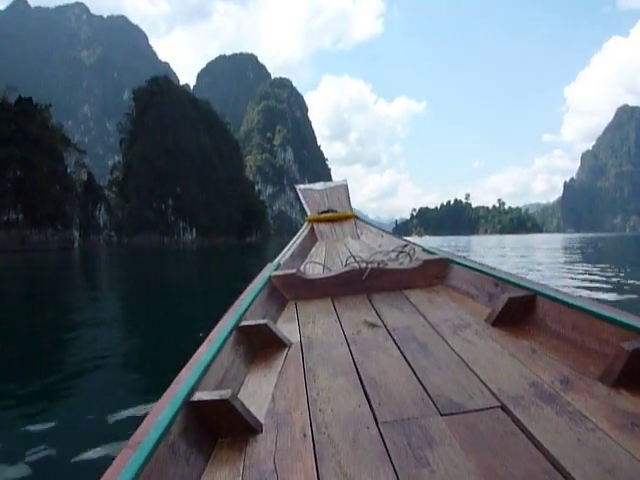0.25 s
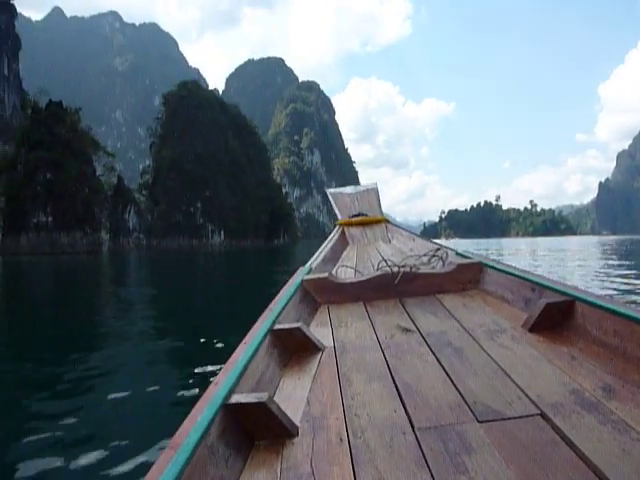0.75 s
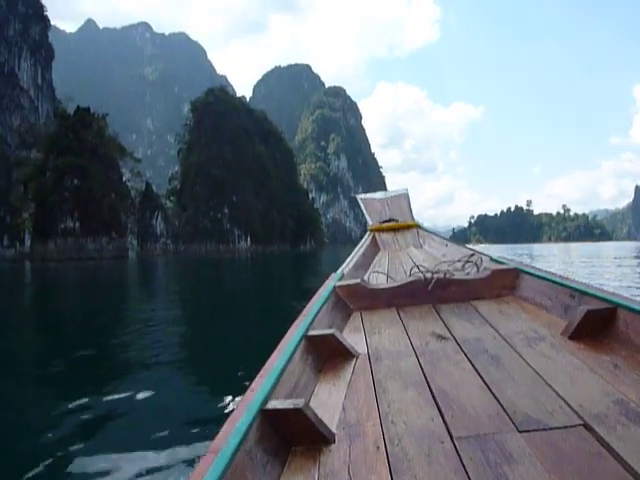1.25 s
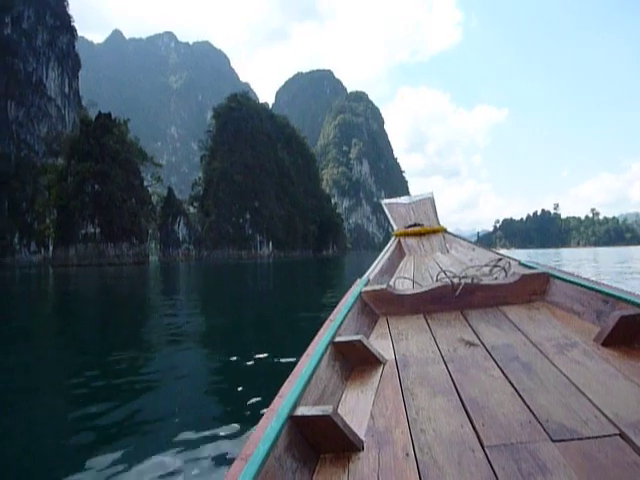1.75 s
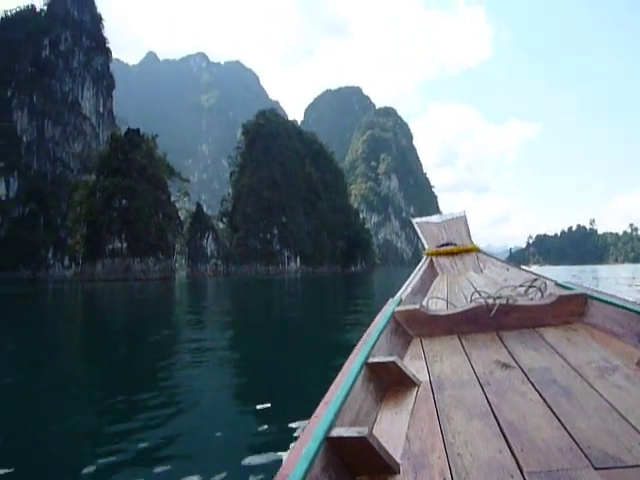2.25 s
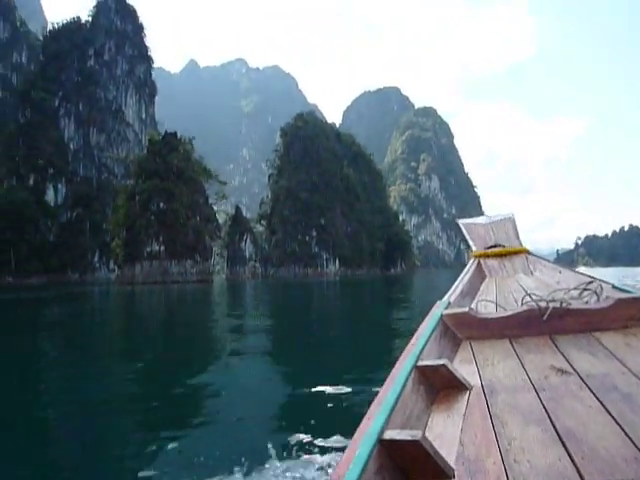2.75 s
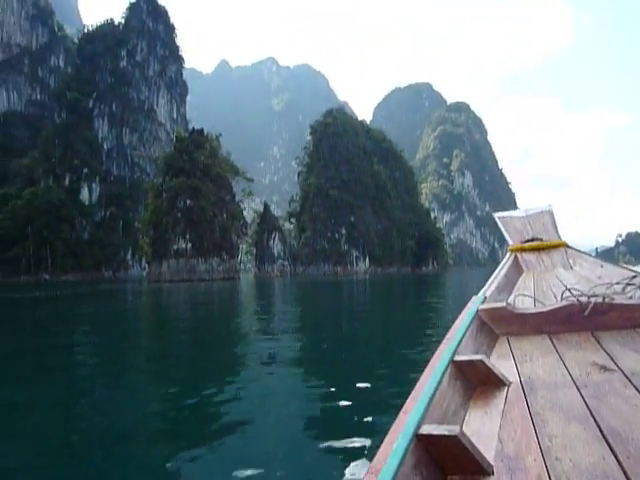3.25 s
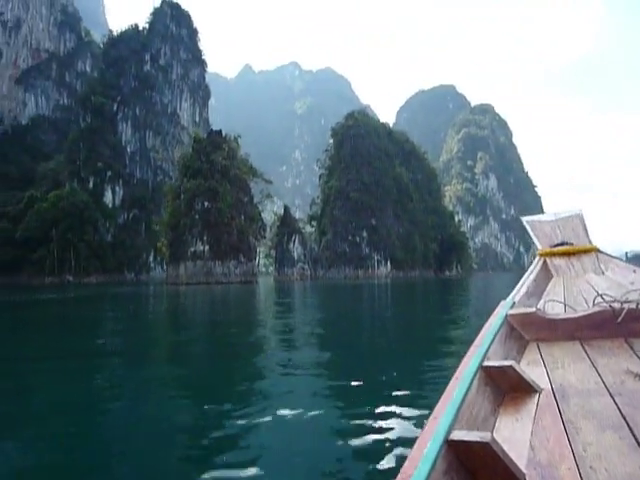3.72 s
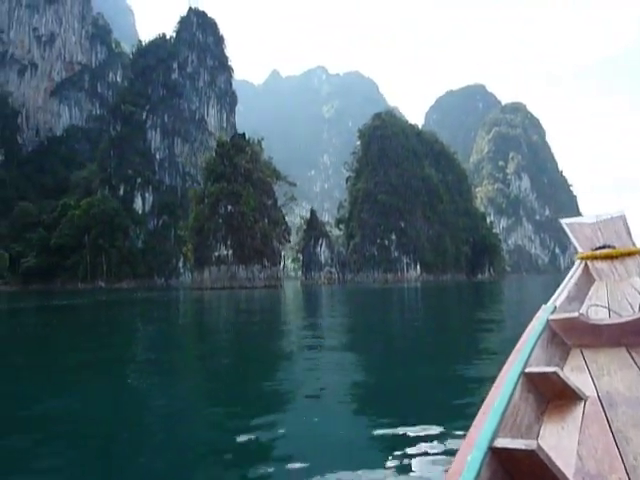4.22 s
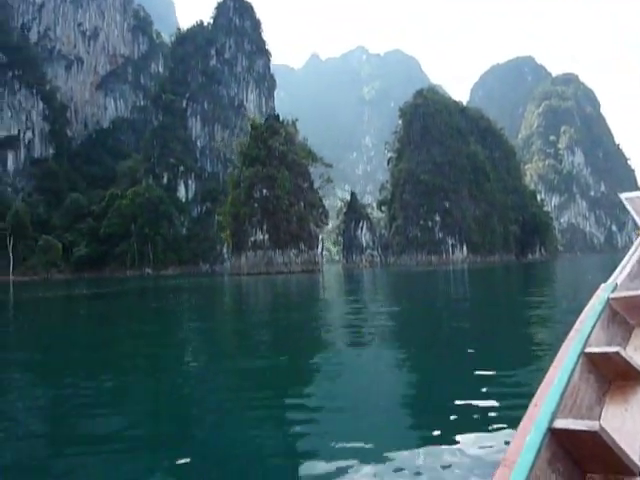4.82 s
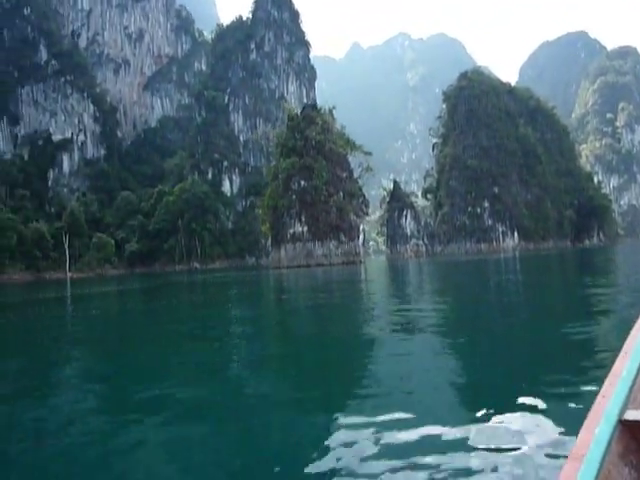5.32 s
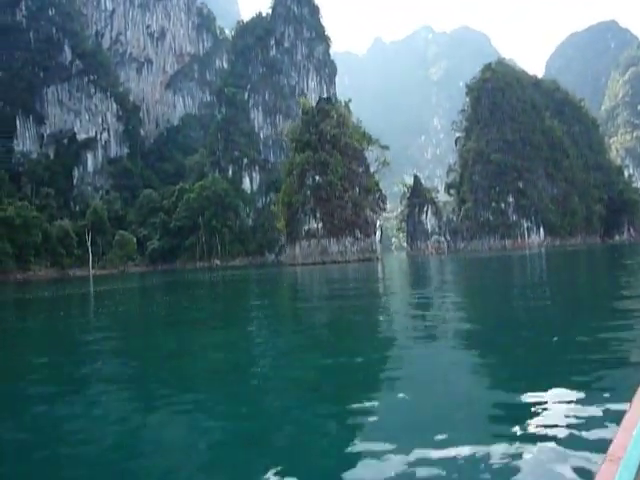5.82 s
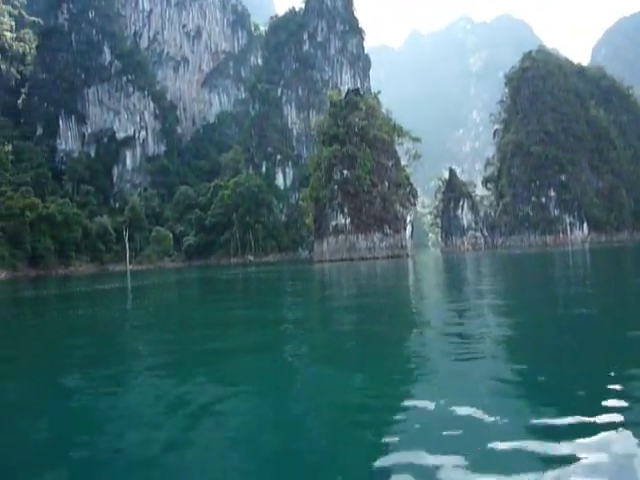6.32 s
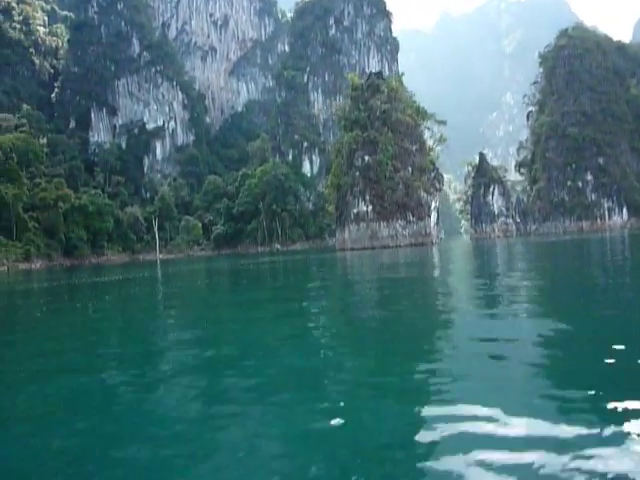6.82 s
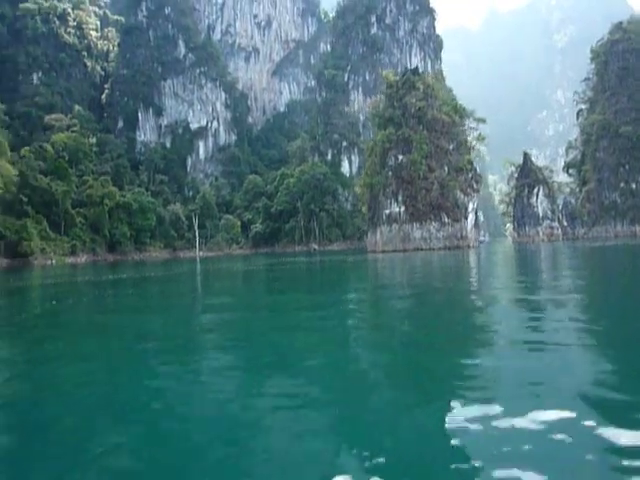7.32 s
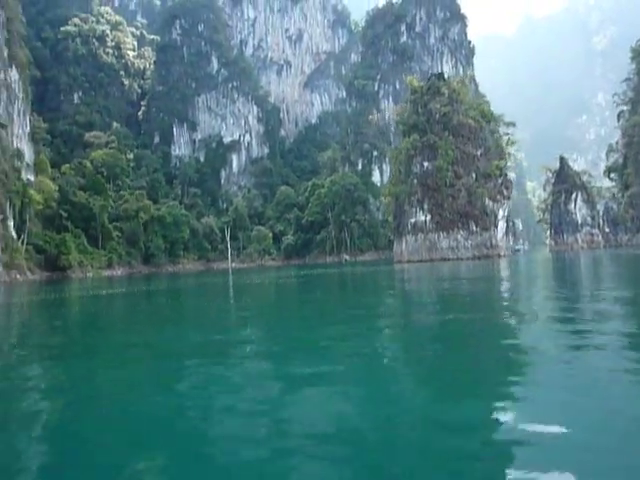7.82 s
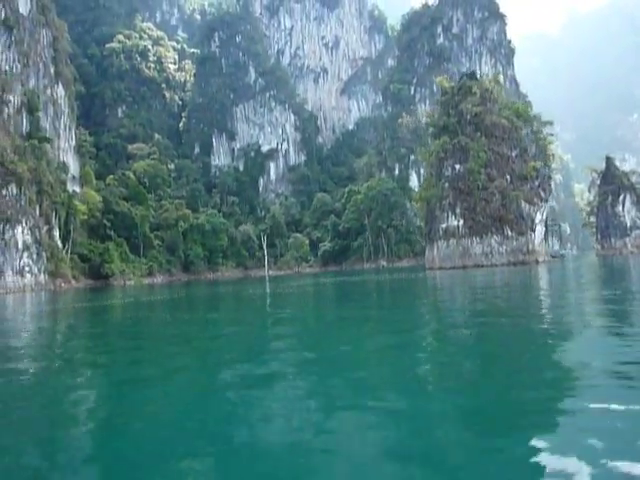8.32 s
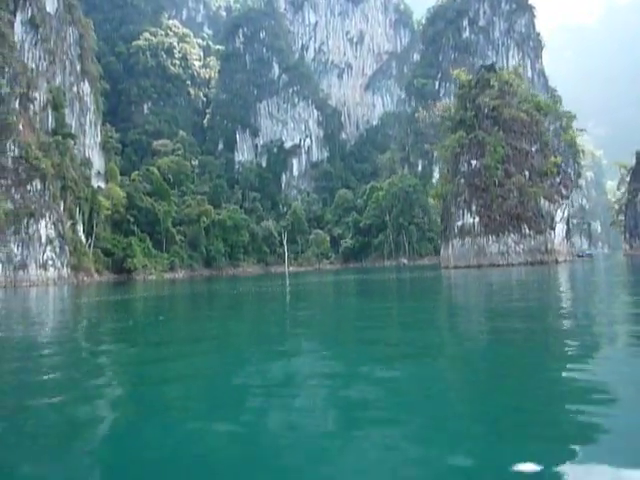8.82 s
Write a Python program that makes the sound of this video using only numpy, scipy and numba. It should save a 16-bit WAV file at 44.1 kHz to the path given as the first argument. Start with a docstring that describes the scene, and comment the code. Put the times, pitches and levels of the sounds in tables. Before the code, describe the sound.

A wooden longboat's diesel drones steadily with a geared whine and clatter, while spray hisses and wind gusts thump the microphone.

```python
"""From the start a six-cylinder diesel drives a wooden longboat over a calm lake at a near-steady speed.
Hum at the firing rate, a geared whine and a clatter repeated each cycle lock to the crank; gas and spray are noise.
Head wind rumbles throughout; its stronger puffs start near 0.5 s, crowd from 1.8 to 3.5 s and thin out after 7.2 s.
A gain control ducks everything under loud puffs; a pocket camera's filters cut the top treble."""
import sys
import numpy as np
from scipy import signal
from scipy.fft import rfft, irfft, next_fast_len
from scipy.io import wavfile
from scipy.ndimage import uniform_filter1d
from numba import njit

SR = 44100
rng = np.random.default_rng(int(sys.argv[2]) if len(sys.argv) > 2 else 0)


def bounce(signal):
    """Save signal as a 16-bit WAV file at the path given by the first command-line argument."""
    frames = np.transpose(np.atleast_2d(signal))
    limited = np.clip(frames, -1, 1)
    pcm = np.round(limited * 32767).astype(np.int16)
    wavfile.write(sys.argv[1], SR, pcm)


N = 399546  # samples

# Levels in dB are rms re full scale, ahead of the microphone gain.


def undb(db):
    """Amplitude gain of a dB value."""
    return 10 ** (np.asarray(db) / 20)


def unit(x):
    """Scale to rms 1."""
    return x / np.sqrt(np.mean(x ** 2))


def curves(table, t):
    """Columns of a table as curves over time; the first column is time in seconds."""
    seconds, *columns = np.transpose(table)
    return [np.interp(t, seconds, column) for column in columns]


def shape(table, hz):
    """Gain of a spectrum table, straight dB lines on a log-frequency axis."""
    f, db = np.transpose(table)
    return undb(np.interp(np.log(np.maximum(hz, 1)), np.log(f), db))


def walk(rate_hz):
    """Random levels, rate_hz new ones a second, smoothed by two moving averages; spread near 1."""
    hold = int(SR / rate_hz)
    steps = np.repeat(rng.standard_normal(N // hold + 1), hold)
    slewed = uniform_filter1d(uniform_filter1d(steps, hold), hold)
    return 1.3 * slewed[:N]


def tone(turns, db, waver_db):
    """A sine locked to a shaft, its level wavering."""
    level = undb(db + waver_db * walk(9.))
    return np.sqrt(2) * level * np.sin(2 * np.pi * (turns + rng.random()))


def rush(table, together_db, alone_db, rate_hz, bands):
    """Coloured noise of rms 1 in overlapping bands that flicker together and alone."""
    size = next_fast_len(N)
    hz = np.arange(size // 2 + 1) * SR / size
    noise = rfft(rng.standard_normal(size)) * shape(table, hz)
    edges = np.log([table[0][0], table[-1][0]])
    place = np.interp(np.log(np.maximum(hz, 1)), edges, [0, bands - 1])
    out = np.zeros(N)
    for k in range(bands):
        band = irfft(noise * np.clip(1 - abs(place - k), 0, 1), size)[:N]
        out += undb(alone_db * walk(rate_hz)) * band
    return unit(out * undb(together_db * walk(rate_hz)))


# Crank speed, drifting a little at held throttle. Each row: time in seconds, speed in rpm.
CRANK_SPEED = [(0, 1373), (.7, 1375), (1.7, 1380), (2.6, 1383), (2.9, 1376), (3.3, 1381), (5.2, 1381),
               (5.7, 1380), (7.2, 1373), (8.2, 1379), (8.6, 1378), (9.06, 1379)]


def crank_cycles(t):
    """Four-stroke cycles run so far; one cycle is two crank turns."""
    cycles_per_s = curves(CRANK_SPEED, t)[0] / 120
    return np.cumsum(cycles_per_s) / SR


CYLINDERS = 6
HUM_DB, HUM_WAVER_DB = -27.5, 0.65
# Other strong tones locked to the cycle: engine harmonics, and side tones (71, 75, 76) of the whine's
# 3rd partial. Each row: multiple of the cycle rate, level in dB.
CYCLE_TONES = [(9, -42), (12, -35), (15, -45), (18, -42), (21, -40), (46, -45), (48, -45), (54, -47),
               (61, -47), (62, -47), (71, -44), (75, -47), (76, -47), (80, -49), (81, -48), (84, -44),
               (87, -50), (88, -50), (94, -48), (96, -52), (98, -49), (105, -51), (106, -47), (110, -51),
               (114, -52), (117, -51), (120, -51), (123, -50)]


def engine_tones(cycle):
    """Firing hum, one period per firing, plus other tones locked to the cycle."""
    hum = tone(CYLINDERS * cycle, HUM_DB, HUM_WAVER_DB)
    return hum + sum(tone(k * cycle, db, 1.2) for k, db in CYCLE_TONES)


CLATTER_DB, CLATTER_WAVER_DB = -35.5, 0.86
# Clatter spectrum. Each row: frequency in Hz at 13 cycles/s (sounds about 12 % lower here), density in dB per Hz.
CLATTER_COLOUR = [(60, -5), (400, -4.5), (700, -7.5), (1200, -2.5), (1800, -3.5), (1950, -7.5),
                  (3500, -13.5), (8000, -35)]


def clatter(cycle):
    """Valves and pistons repeat one random noise pattern every cycle."""
    size = 4096  # points per cycle
    hz = 13.0 * np.arange(size // 2 + 1)
    pattern = unit(irfft(rfft(rng.standard_normal(size)) * shape(CLATTER_COLOUR, hz), size))
    looped = np.append(pattern, pattern[0])
    level = undb(CLATTER_DB + CLATTER_WAVER_DB * walk(6.))
    return level * np.interp(cycle % 1, np.arange(size + 1) / size, looped)


WHINE_PER_CYCLE = 74 / 3
# Strong partials, changing colour as the camera turns.
# Each row: time in seconds, then levels of the 2nd, 3rd, 6th and 9th partial in dB.
STRONG_PARTIALS = [(0, -39, -32, -33, -45), (.4, -39, -30, -35.5, -41.5), (.9, -39, -30.5, -46, -41),
                   (1.5, -37, -28.5, -36.5, -41), (2.5, -43, -27.5, -38, -42.5),
                   (3.6, -39, -27.5, -53, -39), (4.6, -39, -27, -42, -44.5), (5.8, -37.5, -29.5, -55, -45),
                   (6.9, -33.5, -29.5, -51, -40.5), (7.35, -34.5, -34, -47, -43),
                   (8.1, -32.5, -27.5, -41.5, -43.5), (9.06, -32, -29, -40, -49)]
# Weak partials. Each row: multiple of the whine rate, level in dB.
WEAK_PARTIALS = [(4, -49), (5, -48), (7, -60.5), (12, -52)]
# Close pair just under the 9th partial. Entries: multiples of the cycle rate.
CLOSE_PAIR = (219.75, 220)
# Side tones of the 6th partial. Each row: offset in cycle rates, level in dB.
SIXTH_SIDE_TONES = [(-6, -51), (-4, -50), (-3, -51), (-2, -52), (-1, -51), (4, -52), (6, -50), (11, -51)]


def whine(cycle, t):
    """Partials of a toothed part geared to the crank, whose uneven turning trembles the pitch."""
    strong_db = curves(STRONG_PARTIALS, t)
    partials = list(zip((2, 3, 6, 9), strong_db)) + WEAK_PARTIALS
    # phase swings 0.011 whine periods once a crank turn
    shaft = WHINE_PER_CYCLE * cycle + 0.011 * np.sin(2 * np.pi * 2 * cycle)
    out = sum(tone(k * shaft, db, .5 + 0.1 * k) for k, db in partials)
    # beats with the 9th partial about once a crank turn
    out += sum(tone(k * cycle, strong_db[3] - 6.0, 1.3) for k in CLOSE_PAIR)
    # crank turns and cycles rock the 6th partial, 148 cycle rates
    return out + sum(tone((148 + k) * cycle, db, 1.7) for k, db in SIXTH_SIDE_TONES)


def firing_pulse(cycle):
    """A sharp rise and exponential fall at each firing."""
    return np.exp(-(CYLINDERS * cycle % 1) / 0.18)


# Exhaust gas spectrum. Each row: frequency in Hz, density in dB per Hz.
ROAR_COLOUR = [(20, -22.5), (50, 4), (150, 1.5), (450, 4), (650, 0.5), (1100, 0), (1800, -1.5),
               (1950, -3.5), (3000, -10.5), (9000, -31.5)]


def exhaust_roar(cycle, level_db):
    """Gas noise leaves in beats: a puff each firing, a swell each crank turn."""
    beat = 1 + .55 * firing_pulse(cycle) + 0.061 * np.cos(2 * np.pi * 2 * cycle)
    return undb(level_db) * beat * rush(ROAR_COLOUR, 0.97, 1.4, 12., bands=10)


# Spray spectrum. Each row: frequency in Hz, density in dB per Hz.
SPRAY_COLOUR = [(500, -12), (1500, -10), (2600, -2.5), (3500, -5.5), (5000, -6), (7000, -9), (9000, -8)]


def bow_spray(cycle, level_db):
    """Water noise surges as the bow meets ripples; propeller thrust throbs it with cycle and firings."""
    surge = undb(level_db + 0.6 * walk(5.))
    throb = 1 + 0.062 * np.cos(2 * np.pi * cycle) + .12 * firing_pulse(cycle)
    return surge * throb * rush(SPRAY_COLOUR, 0.59, 0.97, 12., bands=5)


# Steady head wind. Each row: time in seconds, level in dB.
BREEZE_LEVEL = [(0, -28.5), (.5, -26.5), (1.5, -27), (2.9, -26.5), (3.5, -26.5), (4.5, -29.5), (4.9, -26),
                (5.5, -28), (6.1, -28), (6.6, -26.5), (7.6, -30.5), (7.9, -27), (8.3, -31), (9.06, -29.5)]
# Wind spectrum. Each row: frequency in Hz, density in dB per Hz.
WIND_COLOUR = [(15, -24), (40, -11), (100, 1), (250, -9), (450, -6.5), (800, -17), (1500, -33.5)]


def breeze(t):
    """Head wind on the microphone: a fluttering low rumble."""
    return undb(curves(BREEZE_LEVEL, t)[0]) * rush(WIND_COLOUR, 2.4, 2.5, 25., bands=6)


# Stronger puffs on the microphone. Each row: centre in seconds, level in dB, centre in Hz, length in ms.
STRONG_PUFFS = [(0.478, -22, 250, 45), (0.575, -24, 150, 35), (0.616, -17, 200, 33), (0.735, -21, 278, 45),
                (0.78, -20, 242, 16), (0.821, -19, 249, 61), (0.849, -18, 252, 28), (1.348, -23.5, 278, 21),
                (1.757, -17, 307.7, 46), (1.83, -15, 204, 58), (1.913, -16.5, 302, 49),
                (1.985, -19, 182.2, 18), (2.012, -20, 218, 26), (2.157, -20.5, 189, 25),
                (2.202, -19, 300.8, 48), (2.324, -22, 247, 81), (2.656, -14.5, 223, 30),
                (2.712, -20.5, 180, 20), (2.741, -17.5, 203, 37), (2.87, -19, 250, 25),
                (2.899, -12.5, 345, 25), (2.93, -18, 250, 20), (2.96, -13, 277, 17),
                (3.017, -15.5, 308, 38), (3.05, -22, 250, 23), (3.088, -15, 302, 52),
                (3.122, -20.5, 400, 25), (3.397, -18, 197, 37), (3.449, -13.5, 286.6, 25),
                (3.648, -22.5, 360, 47), (3.778, -24, 263.4, 29), (3.841, -20.5, 192, 27),
                (3.963, -23.5, 275, 49), (4.181, -25, 189, 26), (4.237, -24, 268.5, 20),
                (4.614, -15.5, 267, 25), (4.799, -16.5, 232, 21), (4.837, -12, 200, 35),
                (4.882, -16.5, 140.7, 22), (4.94, -12.5, 232, 26), (5.374, -22.5, 217, 39),
                (5.604, -19.5, 154.7, 19), (5.661, -24.5, 256, 28), (6.046, -18.5, 217, 28),
                (6.668, -24, 199.9, 24), (6.704, -20, 162, 31), (6.786, -15, 235, 19),
                (6.818, -16, 199, 19), (6.862, -21, 150, 33), (6.91, -17.5, 229, 17.7),
                (6.982, -16, 162, 16), (7.16, -23.5, 211.2, 45), (8.273, -18.5, 199, 57),
                (8.847, -18, 146, 42.3)]
# Faint puffs fall at random; these are mid-range values.
FAINT_COUNT, FAINT_DB, FAINT_HZ, FAINT_MS = 16, -29, 215, 34
KICKS_PER_S = 320.


def wind_puffs(t):
    """Eddies kick the diaphragm at random; each puff is a bell of kicks round its own pitch."""
    out = np.zeros(N)
    puffs = list(STRONG_PUFFS)
    for a, b, c, d in rng.random((FAINT_COUNT, 4)):
        centre_s = .1 + a * (t[-1] - .1)
        puffs.append((centre_s, FAINT_DB + 9.5 * (b - .5), FAINT_HZ * (.75 + .5 * c), FAINT_MS * (.5 + d)))
    size, half = 8192, 4096
    hz = np.arange(half + 1) * SR / size
    lag_s = (np.arange(size) - half) / SR
    for centre_s, db, mid_hz, ms in puffs:
        kicks = rng.standard_normal(size)
        kicks *= 0.047 + (rng.random(size) < KICKS_PER_S / SR)
        kicks[half] = 1.73 * np.sign(kicks[half])  # a sure kick at the heart
        low_side = 1 + (mid_hz / 2.14 / (hz + 1)) ** 3.6
        high_side = 1 + (hz / mid_hz / 1.17) ** 2.3
        bell = np.exp(-(lag_s / (ms / 1600)) ** 4)
        puff = bell * irfft(rfft(kicks) / low_side / high_side)
        puff *= undb(db) * np.sqrt(np.sum(bell ** 2) / np.sum(puff ** 2))
        i = int(centre_s * SR) - half
        out[i:i + size] += puff[:N - i]
    return out


# Levels of the two rushes ahead of their beats. Each row: time in seconds, gas roar in dB, spray in dB.
RUSH_LEVELS = [(0, -30.5, -31), (.3, -26, -26), (.7, -27, -31), (1.1, -26, -29.5), (1.65, -27, -27.5),
               (1.9, -27, -29.5), (2.14, -27.5, -27), (2.3, -28, -30.5), (2.8, -30, -32), (3.1, -29, -29.5),
               (3.38, -29.5, -28.5), (3.6, -31, -30), (3.85, -33.5, -30), (4.3, -28.5, -31),
               (4.9, -33, -29), (5.2, -29.5, -27), (5.45, -31, -31), (5.9, -32, -30.5), (6.5, -28, -28),
               (7.0, -29, -28), (7.35, -31.5, -31), (7.6, -28, -28.5), (8.3, -26, -28.5),
               (9.06, -26.5, -28)]


def scene():
    """Engine, whine, gas, spray and wind summed at the microphone."""
    t = np.arange(N) / SR
    cycle = crank_cycles(t)
    roar_db, spray_db = curves(RUSH_LEVELS, t)
    boat = engine_tones(cycle) + clatter(cycle) + whine(cycle, t)
    boat += exhaust_roar(cycle, roar_db) + bow_spray(cycle, spray_db)
    return (boat + breeze(t) + wind_puffs(t))[None]


@njit
def gain_control(x, knee, attack, release, slope):
    """Envelope follower: quick to duck above the knee, slow to come back."""
    y, envelope = np.empty(len(x)), knee
    for i in range(len(x)):
        a = abs(x[i])
        envelope += (a - envelope) * (attack if a > envelope else release)
        y[i] = x[i] * min(1., knee / envelope) ** slope
    return y


MIC_GAIN_DB = 4.5
ATTACK_S, RELEASE_S = 0.0077, .17
TREBLE_HZ, TOP_HZ = 7980, 9060
# Narrow notches. Each row: centre in Hz, width in Hz.
NARROW_NOTCHES = [(5399, 330), (7709, 500), (8291, 500)]


def record(dry):
    """Gain control, narrow notches, the camera's falling treble and its cut-off."""
    y = gain_control(undb(MIC_GAIN_DB) * dry[0], .15, 1 / (ATTACK_S * SR), 1 / (RELEASE_S * SR), 0.67)
    for hz, width_hz in NARROW_NOTCHES:
        y = signal.lfilter(*signal.iirnotch(hz, hz / width_hz, SR), y)
    y = signal.sosfilt(signal.butter(27, TREBLE_HZ, fs=SR, output="sos"), y)
    return signal.sosfilt(signal.ellip(8, 1, 50, TOP_HZ, fs=SR, output="sos"), y)[None]


dry = scene()
out = record(dry)
bounce(out)
```